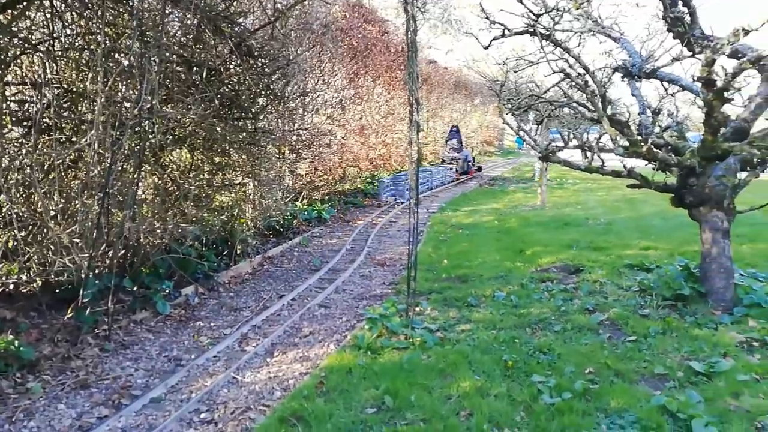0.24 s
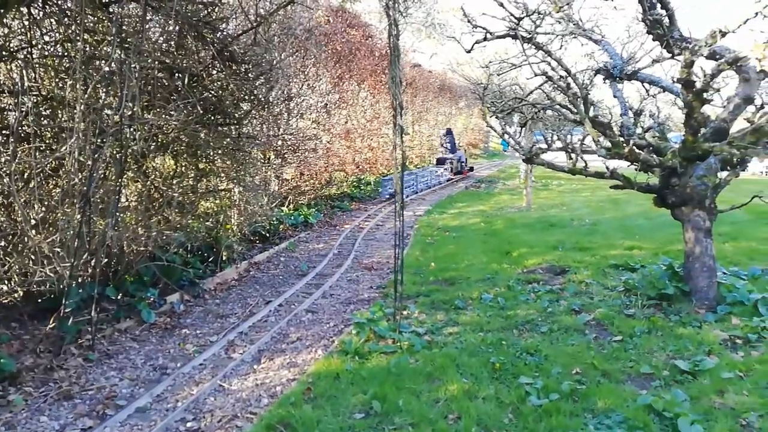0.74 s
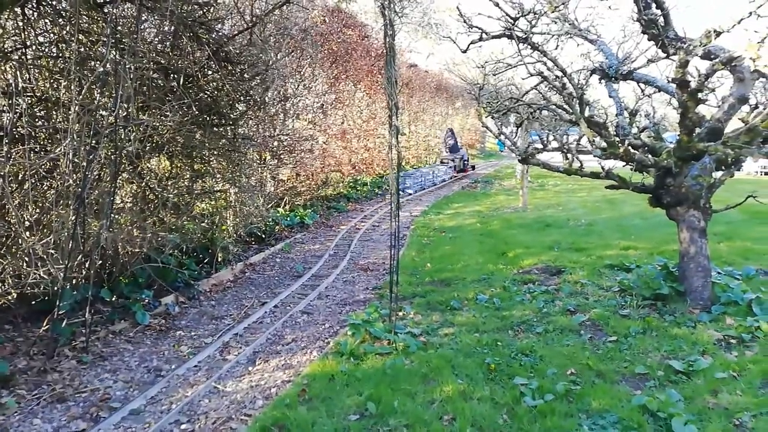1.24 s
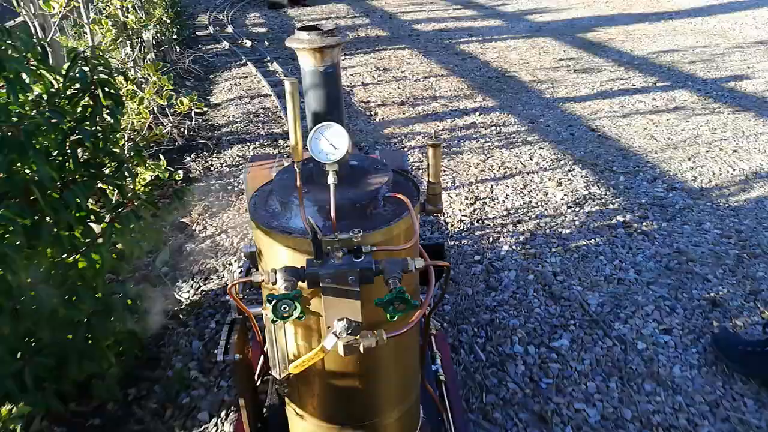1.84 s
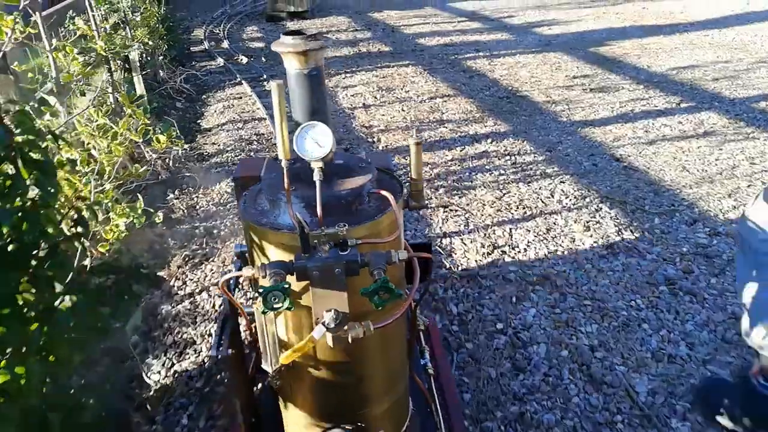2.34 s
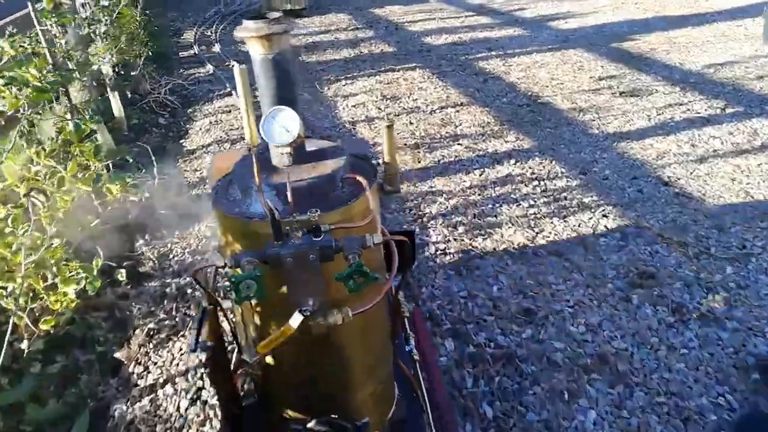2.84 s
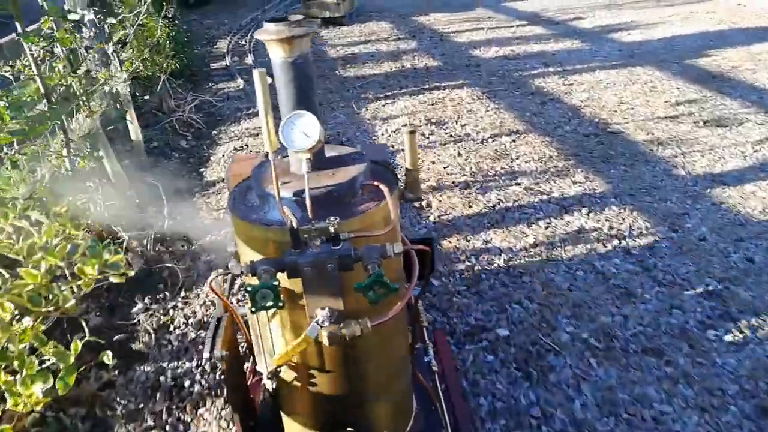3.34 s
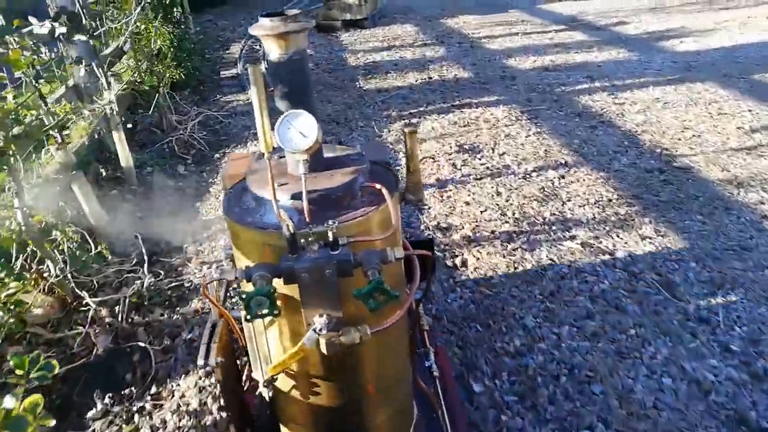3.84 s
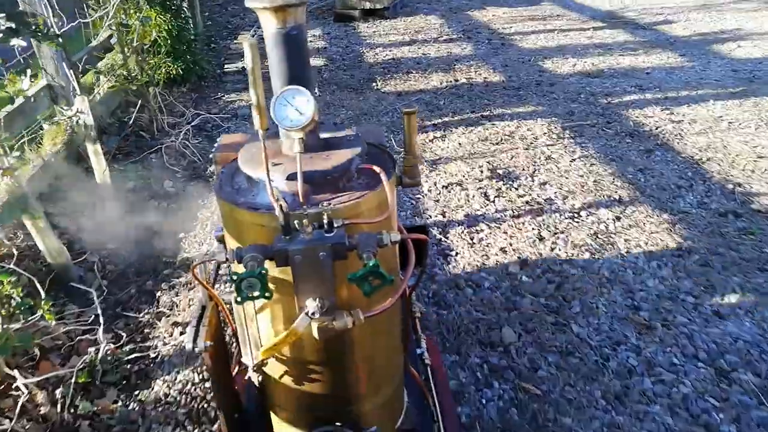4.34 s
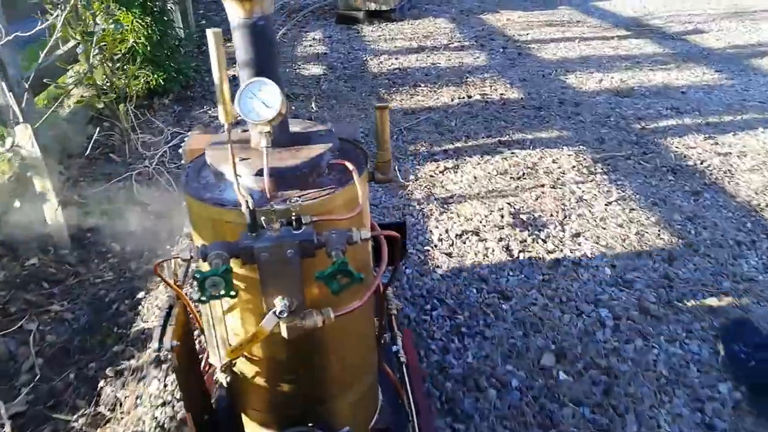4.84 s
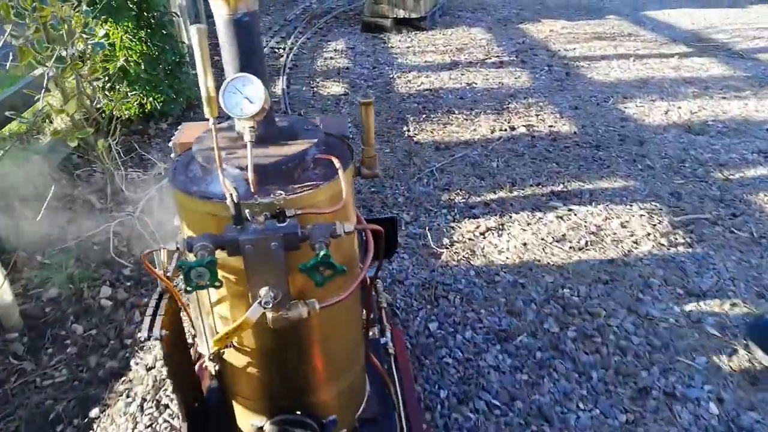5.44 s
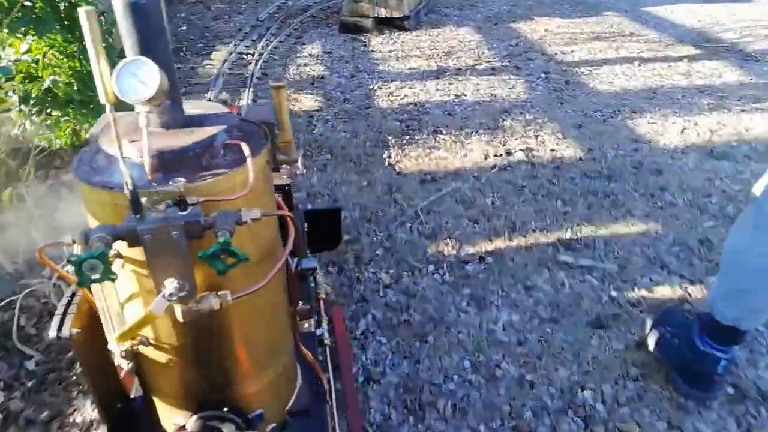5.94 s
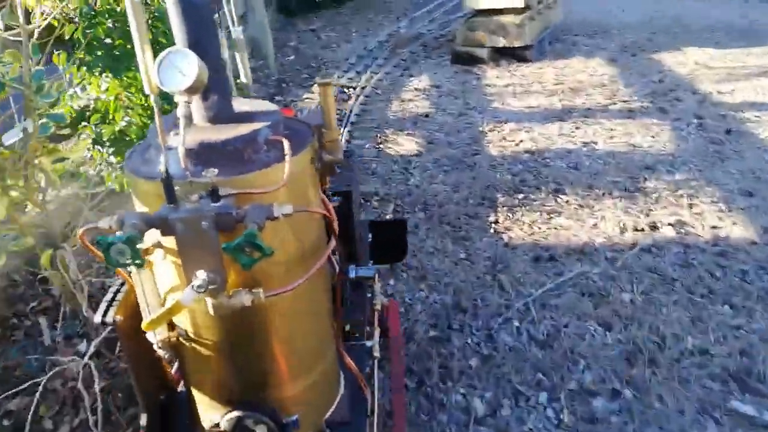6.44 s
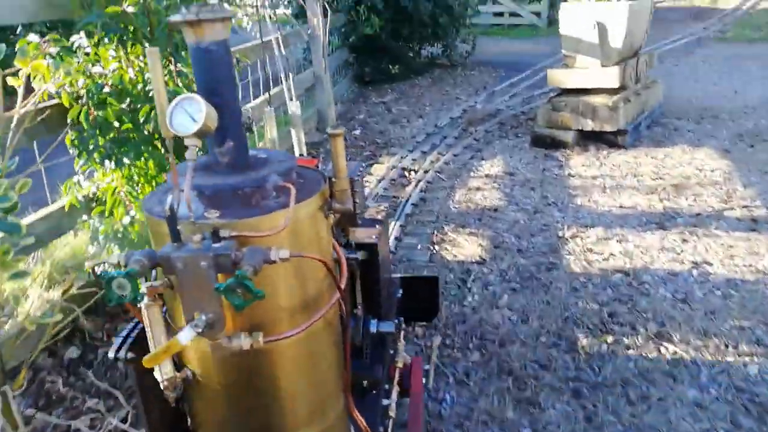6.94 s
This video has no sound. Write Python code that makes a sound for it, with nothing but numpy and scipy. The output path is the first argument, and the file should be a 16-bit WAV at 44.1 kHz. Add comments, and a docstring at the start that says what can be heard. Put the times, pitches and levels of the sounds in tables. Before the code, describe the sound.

From 0 to 1.6 s a miniature steam locomotive is heard far off outdoors: faint, soft, rapid chuffs, roughly fourteen a second, uneven in strength and generally weakening, over a very quiet airy roar. A small bright water spit ticks at 1.5 s. At 1.6 s everything cuts to complete silence until about 2.1 s. Then, with a dull low thump, the engine is suddenly loud and close. Crisp, bright, hissing exhaust puffs run at about eight a second, four to a wheel turn with uneven spacing, each a sharp burst and short breathy tail. Beneath them a gas burner roars with hollow, wavering pipe tones, leak hiss and unsteady low rumble, strongest at entry. Brief water spits spatter, mainly from 2.3 to 3.8 s. The stereo colour shifts from about 5.5 s; slightly weaker puffs around 6.7 s recover, and chuffing continues to the end near 7.2 s.

```python
"""Exhaust steam of a miniature gas-fired steam locomotive chuffs four to a wheel turn in a limping beat: noise
in ranges, gated by steam flow. First it is far off along a hedge, then, after a silent cut, at the driver's
seat. The burner roars as noise ringing the flue's pipe modes, under broad roar and leak hiss; wheels and wind
rumble as low noise; water spits and small knocks come now and then as short noise bursts. The hand-held stereo
pickup turns near the end."""
import sys
import numpy as np
from scipy import signal
from scipy.fft import rfft, irfft, next_fast_len
from scipy.io import wavfile
from scipy.ndimage import uniform_filter1d, map_coordinates

SR = 44100
rng = np.random.default_rng(int(sys.argv[2]) if len(sys.argv) > 2 else 0)


def store_wav(level_fs):
    """Save 16-bit WAV to argv[1]."""
    pcm = np.round(np.clip(np.atleast_2d(level_fs), -1, 1) * 32767)
    wavfile.write(sys.argv[1], SR, pcm.T.astype(np.int16))


N = 316197
T = np.arange(N) / SR
CUT_START_S, CUT_END_S = 1.607, 2.089  # silence between far and near
SPLIT = int(1.85 * SR)  # sample where far settings give way to near ones
TOP_HZ = 16000

# all dB in the tables are relative: the layers add gains of their own
# exhaust beats, strokes in turn: (time [s], upper hiss [dB], lower hiss [dB], upper jet [dB], lower jet [dB],
# upper thud [dB], lower thud [dB], after-blow against the usual of its stroke [dB], logistic rise constant [ms])
BEATS = [(0.0175, -18, -12, -20, -18.5, -33.5, -30.5, 2, 4.3),
         (0.072, -16, -21.5, -29, -28, -44.5, -46.5, -2.5, 4.4),
         (0.129, -22, -24.5, -23, -25, -35, -39, -4, 3), (0.209, -24, -27, -32, -26, -33.5, -35, 0, 2.7),
         (0.288, -20, -22, -31, -23, -38, -45, 0, 3), (0.340, -21, -19, -26, -33, -33.5, -36, 0.5, 4.2),
         (0.412, -25, -28, -24, -27.5, -28, -42, -4, 4), (0.488, -21.5, -21, -21, -19, -41, -46, 1, 2.3),
         (0.565, -27.5, -27.5, -29, -26, -44, -30, 0.5, 3), (0.627, -35, -32, -34, -29, -34, -27, -6, 3),
         (0.688, -25.5, -27, -26, -19, -39.5, -39, -1, 3), (0.775, -21, -25, -25.5, -19, -41, -29, -3, 2.5),
         (0.852, -27, -24.5, -27, -24, -38, -34, -0.5, 2.7), (0.908, -27, -24, -28, -26, -44, -41, -0.5, 3),
         (0.982, -30, -26, -20, -26, -41, -31, -1, 4), (1.060, -36, -31.5, -29, -32, -34, -32, -1, 3),
         (1.139, -31, -32.5, -24, -26, -43, -32, 0, 3), (1.198, -30, -32.5, -32.5, -25, -41.5, -45, 1, 3.3),
         (1.272, -23, -26, -22, -32, -31, -32, 4, 5.9), (1.355, -28, -31, -27, -27, -35.5, -40, 4.5, 3),
         (1.438, -23, -19, -25, -31, -34, -33, 0, 4), (1.512, -38, -36, -35, -36, -47, -48, 0, 3),
         (1.565, -21, -26, -25, -26, -38.5, -30, 1.5, 3),
         (2.071, -7.5, -3, -1.5, -13.5, -10.5, -17.5, 2, 1.8), (2.180, -4, 0, -2.5, -1, -19, -19, -5, 2.6),
         (2.276, -9, -2, -4, -13, -12, -13, 0, 4), (2.383, -6.5, -1, -3, -10, -22, -22, 0.5, 2.2),
         (2.526, -1.5, -1, 0, -4, -15, -15.5, 6, 3.7), (2.653, -1, -3, -1, -6, -20, -13, 0, 2.1),
         (2.751, -2.5, -16, 0, -9, -17.5, -11.5, -0.5, 3.2), (2.865, -2, -6, -3, -3.5, -23, -15.5, 0, 2.7),
         (3.006, -0.5, -3, -1, -5, -17, -14, 6, 3.8), (3.1427, 0, -8, -6, -9, -16, -18, 0, 2.5),
         (3.241, -4, -10, -6, -6, -16, -14, 1, 4.7), (3.3556, -3, -4, -4, -6, -16, -13, 0.5, 3.3),
         (3.500, -4, -3, -6, -5.5, -15, -14, 6, 2.1), (3.638, -3, -2, -5, -6, -15.5, -21, 1, 3.1),
         (3.735, -7, -1, -3, -9, -12.5, -14, 0.5, 7.1), (3.851, -5, 2.5, -5, -7, -14.5, -14.5, -2, 2.9),
         (3.994, -6.5, 0, -7, -6, -16, -17, 0, 1.4), (4.133, -6.5, -7, -5, -10, -20.5, -19.5, 2, 3.5),
         (4.239, -8, 0, -3, -10, -16.5, -22, 0, 6.4), (4.352, -8, 2, -8, -8.5, -21, -16.5, -1.5, 3.6),
         (4.499, -6, 0, -5.5, -6, -14, -14.5, -5, 1.7), (4.633, -10, -2.5, -11, -13.5, -23, -19.5, 3, 2),
         (4.743, -6, -3.5, -7, -8, -18, -21, -1.5, 6.2), (4.858, -5, -6, -1.5, -7.5, -23, -19, 0.5, 4.7),
         (5.004, -3.5, -7.5, -2.5, -4, -17.5, -16.5, 3, 1.6), (5.141, -5.5, -9.5, -10, -16, -21, -22, 2, 3),
         (5.254, -2.5, -8.5, -7, -13, -20, -20, -1, 5.6), (5.366, 2, -10, -6, -10, -18, -18, 0.5, 1.8),
         (5.508, 0, -16, -4, -13, -21, -16.5, -10, 2), (5.652, 0.5, -21, -3.5, -7, -19, -20, -0.5, 3),
         (5.757, -3.5, -18, -6, 1.5, -19, -15, -1.5, 4.3),
         (5.876, -5.5, -3, -6.5, -9, -15.5, -24, 0.5, 2.5), (6.025, -6.5, -2, -6.5, -3, -16, -15.5, 5, 2.4),
         (6.168, -4, -6, -7, -8.5, -21, -18, 2, 3), (6.272, -4, -2, -4.5, -5, -23, -31, -1, 5.2),
         (6.392, 1, -6, -6, -8, -18, -17.5, 0.5, 2.2), (6.544, -3.5, -3.5, -4, -3.5, -17.5, -14, -2, 1.7),
         (6.680, -11, -13, -8, -12, -13, -17, 1.5, 3.3),
         (6.790, -15, -9.5, -12, -1.5, -16, -13.5, -0.5, 4.5),
         (6.905, -3, -6, -6, -4, -18.5, -22, -0.5, 3.3), (7.0568, -4.5, -6, -6, -2.5, -19, -17, 0, 2.3)]
# the four strokes of a wheel turn: (near after-blow [dB], far after-blow [dB], hiss fall constant [ms])
STROKES = [(-13, -27, 11.7), (-14, -25.5, 8.6), (-13.5, -30.5, 14.5), (-35.5, -31, 21.9)]
# water spat from the exhaust, and a few dull knocks (4.467, 4.697, 5.6194 s) of the same shape: (time [s],
# bright level [dB], dull level [dB], fall constant [ms])
SPITS_AND_KNOCKS = [(1.5003, 4.5, -18, 1.9), (2.305, -14, -30, 3), (2.4792, -9.5, -28.5, 34),
                    (2.605, -22, -33, 8), (2.96, -11, -28, 4.3), (3.3353, -29, -18, 9.8), (3.569, -18, -23, 13),
                    (3.6144, -7, -29, 3), (3.7944, -17, -28, 6.4), (4.467, -33, -18.5, 9.8),
                    (4.697, -22, -16.5, 8), (5.6194, -27, -24, 8.5), (6.601, -8, -32, 4.4)]
# level of the top treble of the steam: (time [s], level [dB])
TREBLE_LEVEL = [(0, 0), (1.6, -2), (2.1, 4.5), (2.6, -0.5), (3.5, 1), (4.2, 1.5), (5, 1), (5.6, -1.5),
                (5.9, 5), (6.3, -1), (6.7, 0.5), (7.17, -2)]
# noise colours: (frequency [Hz], density [dB])
FAR_STEAM = [(290, -50), (500, -18), (784, -18.5), (988, 20), (1140, 8), (2040, -4), (2360, -34.5),
             (3150, -8.5), (3860, -24.5), (4660, -15.5), (7530, -4.5), (9490, -21.5), (11500, -33),
             (14500, -35.5), (16000, -55.5)]
NEAR_STEAM = [(290, -43), (500, -26.5), (893, -7), (1020, -9.5), (1160, -1.5), (1640, -6.5), (1840, -1),
              (2290, -5), (2890, -19), (3250, -23), (5390, -23.5), (8830, 4), (11000, -6), (15300, -19.5),
              (16000, -35)]
FAR_ROAR = [(53, -31), (90, -18.5), (192, -4), (606, -17), (769, -15), (977, -5.5), (1110, -12.5),
            (2000, 3.5), (2530, -21), (3150, -20), (4170, -18), (5650, -12.5), (9510, -27), (14000, -36.5),
            (16000, -60)]
NEAR_ROAR = [(53, -41), (90, 4), (176, 10.5), (448, -21.5), (804, -10.5), (876, -18), (998, -8), (1190, -5),
             (1640, -12), (1950, -9.5), (2230, -15), (3290, -25.5), (9310, -15), (14700, -18), (16000, -28)]
RUMBLE_COLOUR = [(15, -22), (30, -3), (60, -4.5), (110, -1), (160, -15.5)]
# flue pipe modes: (frequency [Hz], nominal width [Hz], level against the drive [dB])
FAR_FLUE = [(183, 61, -6), (959, 76, -10), (1925, 300, -8), (3120, 570, -6)]
NEAR_FLUE = [(178.4, 47.3, 0), (890.5, 52, -6), (1461, 51, -10), (1850, 85, -9), (2810, 82, -15.5),
             (3712, 210, -18)]
# burner: (time [s], roar [dB], leak hiss [dB])
FIRE_LEVEL = [(0, -35, -46.5), (0.5, -36.5, -52), (0.75, -37, -50), (1.15, -37, -52), (1.6, -38, -51.5),
              (2.05, -25, -29.5), (2.55, -29.5, -37), (2.7, -30.5, -38), (2.8, -26, -31.5), (3.2, -30, -39),
              (3.65, -31, -39), (4.25, -31.5, -40), (5.2, -32, -37), (5.55, -32, -40), (5.8, -31.5, -40),
              (6.3, -30, -38), (6.7, -31.5, -46), (7.17, -33, -40)]
# wheels and wind: (time [s], level [dB])
RUMBLE_LEVEL = [(0, -51), (0.6, -50), (1.0, -52.5), (1.6, -54.5), (2.05, -30.5), (2.37, -54), (2.52, -39),
                (2.75, -47.5), (3.26, -47), (3.69, -62), (3.95, -32.5), (4.22, -44), (4.35, -34.5),
                (4.65, -49), (5.2, -37), (5.32, -30.5), (5.58, -46), (5.7, -34.5), (6.18, -37), (6.35, -47),
                (6.63, -28), (6.79, -41), (6.88, -36), (7.17, -38)]
# flame drive on the lowest flue mode, far list then near list: (time [s], level [dB])
LOW_MODE_DRIVE = [
    [(0.0, -43.5), (0.078, -53), (0.11, -38), (0.144, -53), (0.254, -38), (0.44, -55), (0.738, -37.5),
     (0.764, -54), (0.8, -43), (0.958, -41.5), (1.1, -52), (1.16, -33.5), (1.192, -49.5), (1.324, -48.5),
     (1.358, -35), (1.39, -54), (1.43, -48), (1.464, -55), (1.49, -51), (1.58, -53)],
    [(2.11, -26.5), (2.29, -41), (2.31, -29.5), (2.73, -37), (2.78, -30), (2.88, -36), (3.47, -34.5),
     (3.52, -26.5), (3.56, -39), (3.6, -26), (3.67, -33.5), (3.85, -36), (4.05, -31.5), (4.33, -31),
     (4.5, -34), (4.83, -28.5), (4.95, -35.5), (5.05, -31.5), (5.2, -32), (5.37, -28.5), (5.39, -43),
     (5.44, -33.5), (5.75, -32), (5.95, -34), (6.26, -32), (6.29, -26), (6.77, -36.5), (6.88, -30),
     (7.03, -36.5), (7.16, -31)],
]
# flame drive on the second flue mode: (time [s], level [dB])
SECOND_MODE_DRIVE = [(0, -37), (0.46, -36.5), (0.74, -41), (1.27, -37), (1.6, -44), (2.05, -28.5),
                     (2.3, -27), (2.56, -31), (2.83, -30.5), (3.16, -36), (3.5, -28), (3.68, -32),
                     (3.97, -28.5), (4.32, -43), (4.55, -35), (4.7, -24), (4.8, -39), (4.94, -41),
                     (5.15, -32), (5.5, -34.5), (5.8, -27), (6.1, -29.5), (6.4, -33), (6.75, -26.5),
                     (6.9, -40), (7.17, -37)]
# flue mode near 1.9 kHz: (time [s], pitch [Hz], level over the other high modes [dB])
KNOCK_MODE = [(0, 1925, 0), (1.6, 1925, 0), (2.1, 1930, 0), (3.3, 1931, -3), (3.65, 1813, 3.5),
              (4.3, 1798, 2.5), (4.5, 1850, 5), (4.7, 1804, 5.5), (5.1, 1814, 1), (5.5, 1886, -2),
              (6.0, 1837, -2), (6.55, 1930, 8.5), (6.7, 1865, 4), (7.17, 1914, -1)]
# hand and pickup shading each port, one list per grip: (frequency [Hz], left [dB], right [dB])
GRIPS = [
    [(500, -1.5, -0.5), (850, -3, 2), (1240, 1.5, 1.5), (1940, -3.5, -1.5), (2380, -2, 5.5), (3000, -3, 4),
     (3800, 1.5, 3), (4600, 6.5, 4), (5630, 1, 4), (6700, -1.5, -2.5), (7540, -4.5, -6), (8600, 2, -1),
     (9720, 1, 9), (12000, -1, 1.5)],
    [(455, 2, 3.5), (800, 3, -1.5), (1200, -6.5, -4.5), (2020, -7, 1), (2630, 2, -6), (3065, 6, 5.5),
     (4340, -7, 5.5), (4670, 5, 3.5), (5690, 7, -5.5), (6980, 0.5, 1), (7560, -0.5, -6), (8020, 4.5, -5.5),
     (9580, 5, -4.5), (10800, -6, -4), (12500, -4.5, -3.5)],
    [(517, 6, 3.5), (896, 3.5, -7), (1240, -8.5, -2.5), (1820, -0.5, -6), (2650, 6.5, -2), (3100, 3, 6),
     (3930, 6, -2), (4440, -6, 0), (5300, 7, 7), (6500, 3.5, -2.5), (7500, 1.5, -8), (8840, -6, -5.5),
     (9470, 0, 1), (9960, 2.5, 2.5), (10700, 0, -1), (11900, 1.5, -4), (13200, -3, -6)],
    [(480, 5.5, 8), (830, 3, -2.5), (1470, -9, -5.5), (1930, 2.5, -6.5), (2470, 0, -8), (3000, 7.5, 5.5),
     (3800, 2, -1.5), (4650, 0, 3.5), (5500, 2.5, 6), (6460, 3.5, -4), (7900, 4.5, -3), (8750, 2.5, -9),
     (9800, -8, -2), (12000, -2, -3.5)],
]
# turning in the hand: (time [s], grip number, lag of the left port [samples], left minus right [dB])
TURN = [(0, 0, 2.5, -0.5), (1.7, 0, 2.5, 1), (1.9, 1, -3, -1.5), (3, 1, -5, 0), (4.5, 1, -4.5, -1),
        (5.4, 1, -6, 1.5), (5.6, 1.3, -5.5, 0.5), (5.95, 2, -8.5, -1), (6.55, 2, -7, -1),
        (6.7, 2.9, -8.5, 0), (7.17, 3, -6, 0.5)]

JET_FAR_DB, JET_NEAR_DB = -15, -19  # jet flow
THUD_TRAIL_DB = -11, -11  # after-blow of the thud against that of the hiss, far and near
THUD_SLOW = 1.19  # fall time of the thud over that of the hiss
TRAIL_FOLLOWS = 0.22  # dB of after-blow per dB of beat over the usual
PATCHY_DB, GRAIN_DB = 1.18, 1  # slow and fast swell of each steam range
WANDER_SHARE = 0.02796, 0.007, 0.02  # pitch drift of low, second and higher flue modes with gas heat


def undb(db):
    """Decibels to amplitude."""
    return 10 ** (np.asarray(db) / 20)


def curves(table):
    """Columns of a time table as sample curves."""
    s, *columns = np.transpose(table)
    return [np.interp(T, s, c) for c in columns]


def walk(rate_hz):
    """Random levels held 1 / rate s, smoothed twice; spread near 1."""
    k = int(SR / rate_hz)
    held = np.repeat(rng.standard_normal(N // k + 1), k)
    return 1.5 * uniform_filter1d(uniform_filter1d(held, k), k)[:N]


def shots(far, near):
    """Far value before the split, near value after it."""
    return np.where(np.arange(N) < SPLIT, far, near)


def noise(colour, lo_hz, hi_hz, count):
    """Three unrelated noises of one colour between two band edges, rms 1."""
    size = next_fast_len(count, True)
    hz = np.arange(size // 2 + 1) * SR / size + 1
    at_hz, level_db = np.transpose(colour)
    shape = undb(np.interp(np.log(hz), np.log(at_hz), level_db))
    shape = shape / np.sqrt((1 + (lo_hz / hz) ** 24) * (1 + (hz / hi_hz) ** 24))
    spectrum = rng.standard_normal((3, len(hz))) + 1j * rng.standard_normal((3, len(hz)))
    x = irfft(shape * spectrum, size)[:, :count]
    return x / np.sqrt(np.mean(x ** 2))


def share(three, alike):
    """Weight rows by power: common to both ports, left alone, right alone."""
    alike = np.clip(alike, 0, 1)
    return three * np.sqrt([[alike], [1 - alike], [1 - alike]])


def band(far, near, lo_hz, hi_hz, alike):
    """One noise range in the far colour, then the near one."""
    parts = [noise(far, lo_hz, hi_hz, SPLIT), noise(near, lo_hz, hi_hz, N - SPLIT)]
    return share(np.hstack(parts), alike)


def flue(modes, drives, knock):
    """Noise rings each pipe mode; each drifts and flickers alone, low ones reach both ports more alike."""
    out = 0
    for hz, width_hz, db in modes:
        order = int(hz > 400) + int(hz > 1200)  # lowest, second, higher
        drive, pitch = drives[order], 1
        if 1600 < hz < 2200:
            drive, pitch = drive * undb(knock[1]), knock[0] / hz
        count = len(drive)
        size = count + SR // 2
        b, a = signal.iirpeak(hz, hz / width_hz / 1.18, SR)
        ring = signal.lfilter(b, a, signal.lfilter(b, a, rng.standard_normal((3, size))))
        read = np.cumsum(pitch + WANDER_SHARE[order] * walk(6)[:count])  # faster reading sounds higher
        ring = np.array([np.interp(read, np.arange(size), row) for row in ring])
        ring = ring / np.sqrt(np.mean(ring ** 2)) * undb(db + 1.22 * walk(16)[:count])
        out = out + share(ring, .97 - 0.12 * np.log(hz / 150)) * drive
    return out


def burner(draught_hi, draught_lo):
    """Flame rings the flue's low modes, roar and exhaust draught its high ones; broad roar and leak hiss join."""
    roar_db, leak_db = curves(FIRE_LEVEL)
    low_db, = curves(list(LOW_MODE_DRIVE[0]) + list(LOW_MODE_DRIVE[1]))
    second_db, = curves(SECOND_MODE_DRIVE)
    drives = np.array([undb(low_db + 1.4 * walk(9)),
                       undb(second_db) + 0.3 * draught_lo,
                       0.37 * undb(roar_db) + 0.77 * draught_hi])
    knock = np.array(curves(KNOCK_MODE))
    out = np.hstack([flue(FAR_FLUE, drives[:, :SPLIT], knock[:, :SPLIT]),
                     flue(NEAR_FLUE, drives[:, SPLIT:], knock[:, SPLIT:])])
    for lo_hz, hi_hz, db, alike in [
            (89.5, 234, -10.0, 0.91), (228.3, 410, -12.5, 0.72), (438, 1320, -4.5, 0.29),
            (1270, 2320, -3.5, 0.64), (2530, 4700, -12.5, 0.33), (5100, 8100, -8.5, 0.17),
            (7270, 9500, -2.0, 0.14)]:
        flicker_db = 1.78 * shots(0.68, 0.96) * walk(15)
        out = out + band(FAR_ROAR, NEAR_ROAR, lo_hz, hi_hz, alike) * undb(roar_db + db + flicker_db)
    leak = band(FAR_ROAR, NEAR_ROAR, 10200, 17000, .3) * undb(leak_db + 1.1 * walk(36))
    return out + leak


def wheels_and_wind():
    """Low noise of unsteady level."""
    level_db = curves(RUMBLE_LEVEL)[0] + 1.9 * walk(12) + 0.78 * walk(4.3)
    return band(RUMBLE_COLOUR, RUMBLE_COLOUR, 18, 220, 0.83) * undb(level_db)


def blast(column, late_ms, blow_s, shut_s, trail_db=(0, 0), slow=1):
    """Steam flow: the port opens fast, pressure drops, an after-blow trails until the valve shuts."""
    env, lead = np.zeros(N), 600
    far_usual_db = np.median([r[column] for r in BEATS if r[0] < CUT_START_S])
    near_usual_db = np.median([r[column] for r in BEATS if r[0] >= CUT_START_S])
    next_s = [r[0] for r in BEATS[1:]] + [N / SR + 1]
    for k, (row, after_s) in enumerate(zip(BEATS, next_s)):
        near_db, far_db, fall_ms = STROKES[k % len(STROKES)]
        a = max(int(row[0] * SR) - lead, 0)
        far = a < SPLIT
        count = int(min(after_s - row[0], .3) * SR)
        ms = 1000 * (T[a:a + count] - row[0]) - late_ms
        run = np.clip(ms, 0, None)
        rise = 1 / (1 + np.exp(-ms / row[-1]))
        over_db = np.clip(row[column] - (far_usual_db if far else near_usual_db), -8, 8)
        after_db = far_db + trail_db[0] if far else near_db + trail_db[1]
        trail = undb(after_db + row[-2] + TRAIL_FOLLOWS * over_db) * np.exp(-run / 1000 / blow_s)
        drop = undb(row[column]) * np.exp(-run / fall_ms / slow) + trail
        shut = 0.58 + 0.18 * np.clip((ms[-1] - ms) / 1000 / shut_s, 0, 1)
        env[a:a + len(ms)] = rise * drop * shut + env[a - 1] * (1 - rise)
    return env


def steam(lo_hz, hi_hz, alike):
    """One range of turbulent steam with quick flicker."""
    flicker_db = 1.27 * walk(90) + 0.21 * walk(30)
    return band(FAR_STEAM, NEAR_STEAM, lo_hz, hi_hz, alike) * undb(flicker_db)


def patchy():
    """Swell of one range: colour differs from puff to puff, droplets clump within a puff."""
    return undb(PATCHY_DB * walk(18) + GRAIN_DB * walk(200))


def exhaust(draught_hi, draught_lo):
    """Steam noise range by range: air, hiss and jet follow the port, the later thud the chimney draught."""
    bright_spit, dull_spit = spits(column=1), spits(column=2)
    hiss_hi, hiss_lo = [undb(-8.5) * blast(column=c, late_ms=.3, blow_s=0.13, shut_s=0.0082)
                        + undb(-13.0) * bright_spit for c in (1, 2)]
    jet_gain = undb(4) * shots(undb(JET_FAR_DB), undb(JET_NEAR_DB))
    jet_hi, jet_lo = [jet_gain * blast(column=c, late_ms=.3, blow_s=0.14, shut_s=0.0088)
                      + undb(-24.0) * bright_spit for c in (3, 4)]
    air = steam(11660, 17000, 0.48) * hiss_hi ** 0.81 * shots(undb(-23.5), undb(-14.5))
    air = air + undb(-21.5) * steam(10600, 11900, .5) * hiss_hi
    air = air * undb(curves(TREBLE_LEVEL)[0])
    hiss = undb(-3.0) * steam(8820, 10600, 0.42) * patchy() ** 0.6 * hiss_hi
    hiss = hiss + undb(-3.0) * steam(7070, 8120, .52) * patchy() ** 0.61 * hiss_lo
    upper = undb(-5.5) * steam(4330, 5760, 0.21) * patchy()
    upper = upper + undb(-2.5) * steam(6160, 6460, 0.67) * patchy()
    lower = undb(-7.5) * steam(2590, 3220, 0.38) * patchy()
    lower = lower + undb(-9.5) * steam(3500, 4120, 0.44) * patchy()
    thud = undb(-5.5) * steam(590, 1315, 0.65) * patchy() * draught_lo
    thud = thud + undb(-5.0) * steam(1426, 2030, 0.84) * patchy() * draught_hi
    dull_burst = band(FAR_STEAM, NEAR_STEAM, 1500, 3040, 0.58) * dull_spit
    return air + hiss + upper * jet_hi + lower * jet_lo + thud + dull_burst


def spits(column):
    """Flow of water spits and small knocks: short bursts with a fast rise and exponential fall."""
    env, ms = np.zeros(N), 1000 * T[:2000]
    for row in SPITS_AND_KNOCKS:
        a = int(row[0] * SR)
        env[a:a + len(ms)] += undb(row[column]) * (1 - np.exp(-ms / 0.9)) * np.exp(-ms / row[3])
    return env


def thump():
    """Low thump as the near sound starts: a step decaying to zero."""
    return -.05 * (T >= CUT_END_S) * np.exp(-np.clip(T - CUT_END_S, 0, 1) / 0.067)


def shade(dry):
    """Each grip colours the two ports its own way; one blends into the next as the pickup turns."""
    grip, _, pan_db = curves(TURN)
    size = next_fast_len(N, True)
    hz = np.arange(size // 2 + 1) * SR / size + 1
    spectrum, out = rfft(dry, size), 0
    for k, table in enumerate(GRIPS):
        at_hz, *sides_db = np.transpose([(250, 0, 0)] + list(table))  # flat below 250 Hz
        gain = undb([np.interp(np.log(hz), np.log(at_hz), db) for db in sides_db])
        out = out + np.clip(1 - abs(grip - k), 0, 1) * irfft(spectrum * gain, size)[:, :N]
    return out * undb(np.array([pan_db, -pan_db]) / 2)


def scene():
    """Burner, rumble and exhaust at two ports; the common sound reaches them a few samples apart."""
    draught_hi, draught_lo = [blast(column=c, late_ms=2.8, blow_s=0.13, shut_s=0.011,
                                    trail_db=THUD_TRAIL_DB, slow=THUD_SLOW) for c in (5, 6)]
    fire = burner(draught_hi, draught_lo)
    common, left, right = fire + wheels_and_wind() + exhaust(draught_hi, draught_lo)
    lagged = map_coordinates(common, [np.arange(N) - curves(TURN)[1]], order=3, mode="nearest")
    return np.array([lagged + left, common + right])


def record(dry):
    """Far sound ends within a few ms, near sound starts at once with a thump; peaks round off, the top is cut."""
    far_gate = np.where(T < CUT_START_S, 1, np.exp(-np.clip(T - CUT_START_S, 0, 1) / 0.0039))
    heard = shade(dry) * (far_gate + (T >= CUT_END_S)) + thump()
    heard = heard / (1 + abs(heard) ** 6) ** (1 / 6)
    return signal.sosfilt(signal.ellip(10, .2, 80, TOP_HZ, fs=SR, output="sos"), heard)


dry = scene()
out = record(dry)
store_wav(out)
```